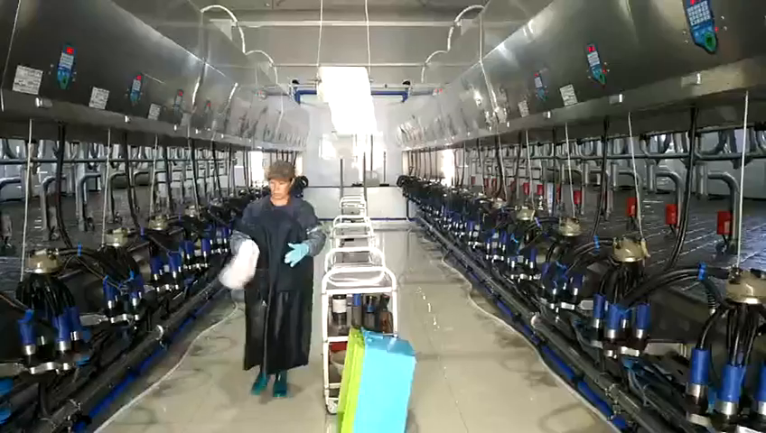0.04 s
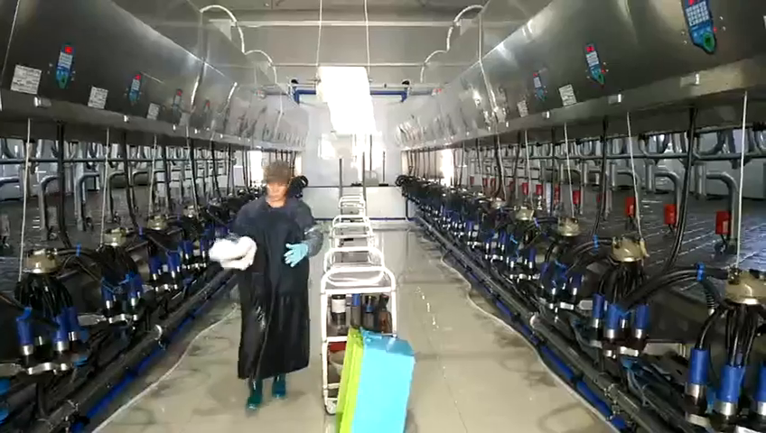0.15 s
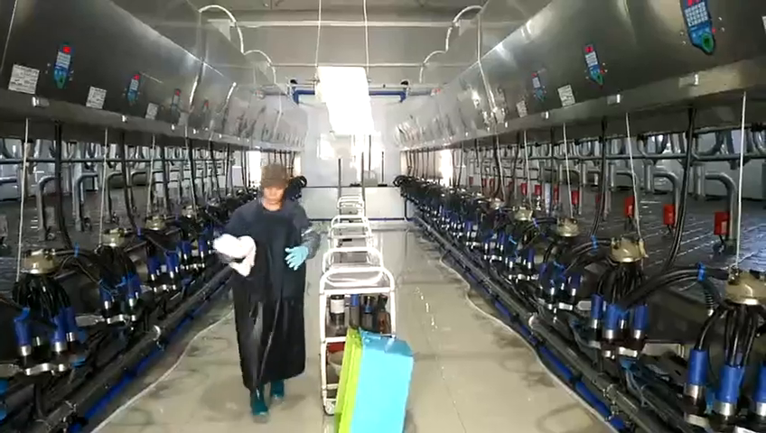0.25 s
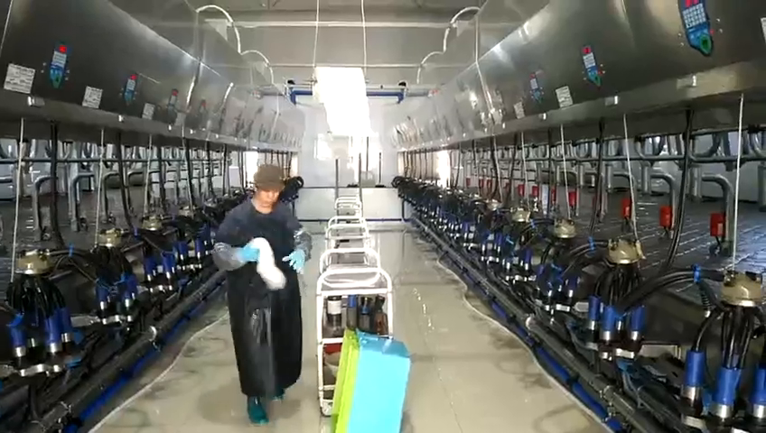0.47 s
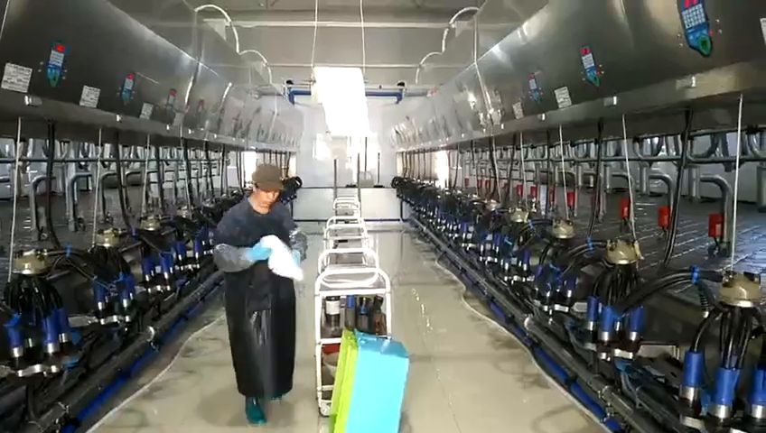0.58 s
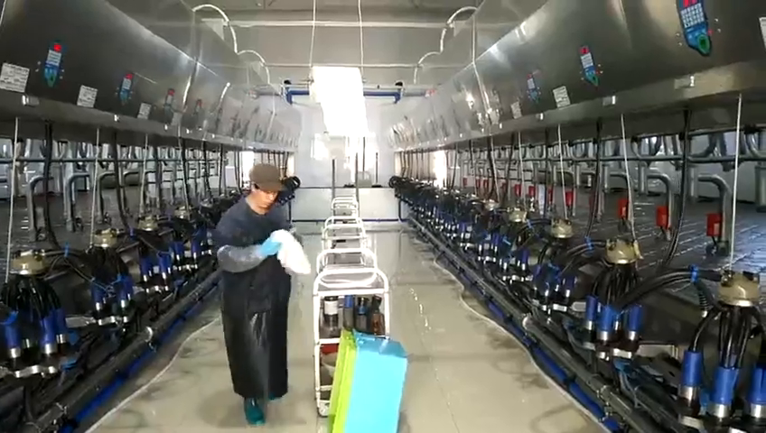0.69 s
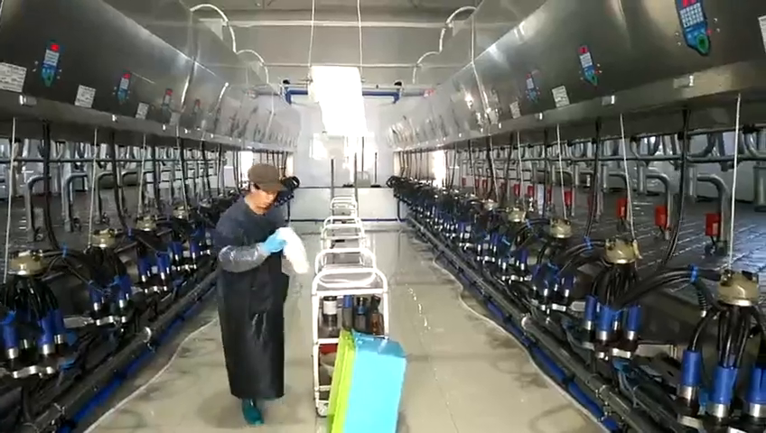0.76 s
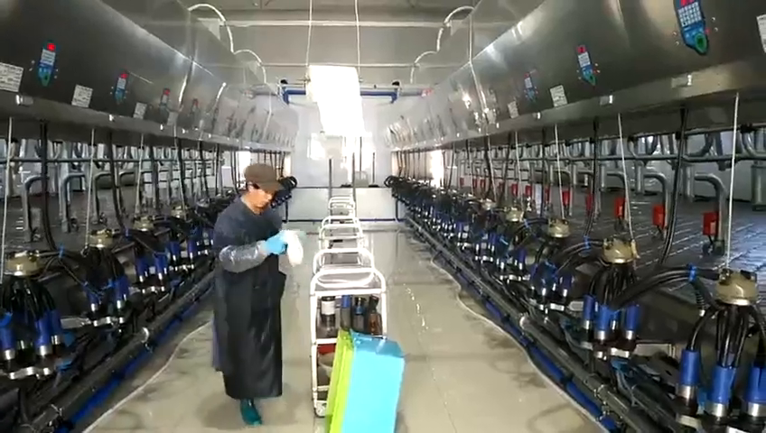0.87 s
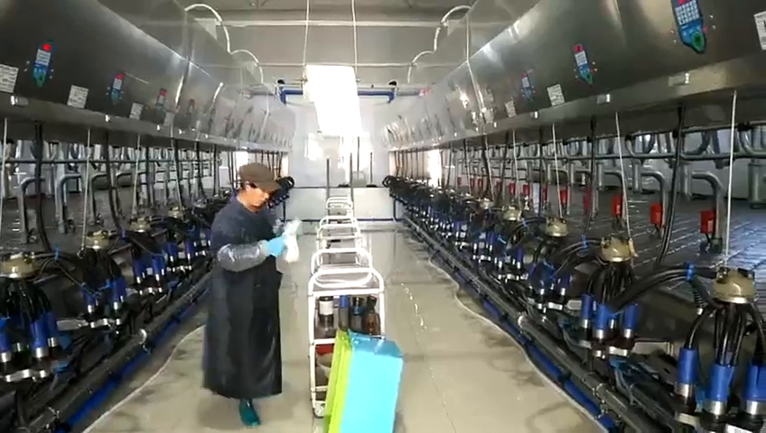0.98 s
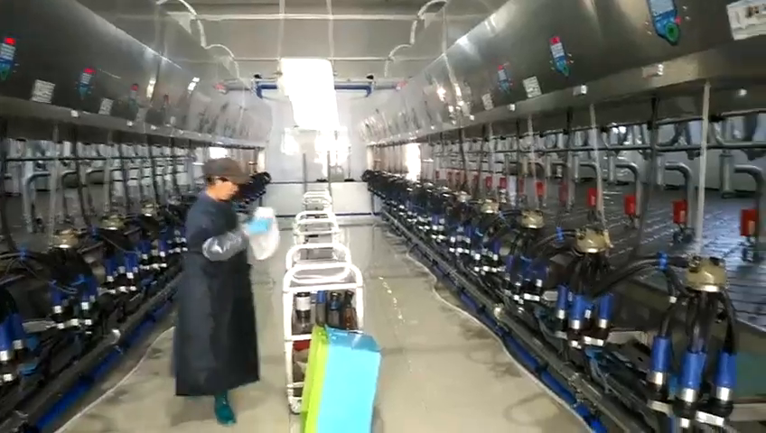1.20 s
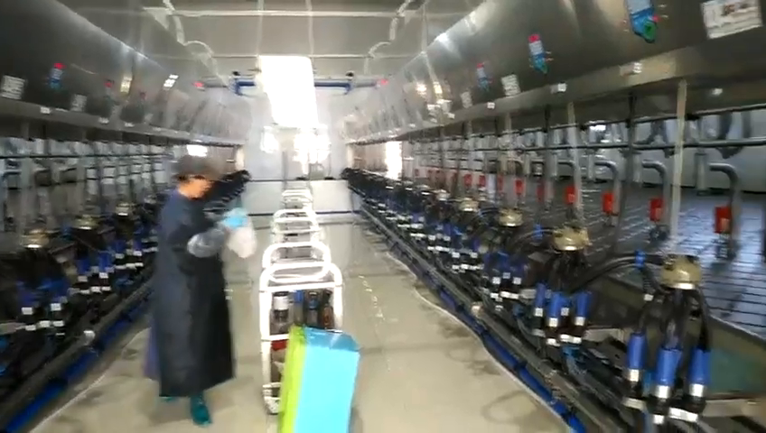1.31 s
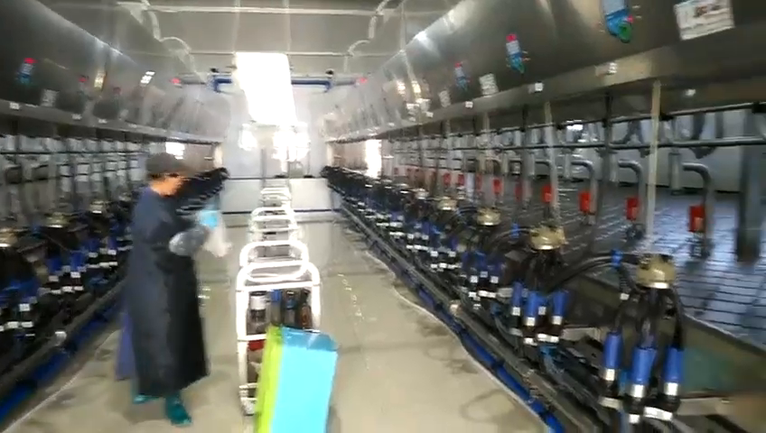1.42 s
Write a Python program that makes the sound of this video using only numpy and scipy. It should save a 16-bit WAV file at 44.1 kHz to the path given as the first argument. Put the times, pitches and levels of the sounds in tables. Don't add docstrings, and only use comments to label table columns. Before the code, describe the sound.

Loud airy pump rush and low hum in a hard-walled dairy parlor, easing off with metallic clicks

```python
import sys
import numpy as np
from scipy import signal
from scipy.io import wavfile

SR = 44100
rng = np.random.default_rng(int(sys.argv[2]) if len(sys.argv) > 2 else 0)


def dump(signal):
    limited = np.clip(np.atleast_2d(signal).T, -1, 1)
    pcm = np.round(limited * 32767).astype(np.int16)
    wavfile.write(sys.argv[1], SR, pcm)


def decibels_to_gain(level_db):
    exponent = np.asarray(level_db, float) / 20
    return 10 ** exponent


N = 63945
TIME_S = np.arange(N) / SR


def rms_one(x):
    return x / np.sqrt(np.mean(x ** 2) + 1e-20)


def in_time(rows):
    time_s, *columns = np.transpose(rows)
    return [np.interp(TIME_S, time_s, column) for column in columns]


def drift(rate_hz):
    pole = np.exp(-80 * np.pi * rate_hz / SR)
    white = rng.standard_normal(N // 40 + 2002)
    slow = signal.lfilter([1], [1, -2 * pole, pole * pole], white)[2000:]
    return np.interp(np.arange(N) / 40, np.arange(len(slow)), rms_one(slow))


def ring(x, pitch_hz, t60_s):
    radius = decibels_to_gain(-60 / (t60_s * SR))
    angle = 2 * np.pi * pitch_hz / SR
    feedback = [1, -2 * radius * np.cos(angle), radius * radius]
    return signal.lfilter([0, np.sin(angle)], feedback, x + 1e-18)


def bandpass(x, order, low_hz, high_hz):
    return signal.sosfilt(signal.butter(order, [low_hz, high_hz], "band", fs=SR, output="sos"), x)


def highpass(x, order, low_hz):
    return signal.sosfilt(signal.butter(order, low_hz, "high", fs=SR, output="sos"), x)


def banded_noise(spectrum, patchy_db):
    out, together = 0, drift(9)
    edges = 35 * 2 ** np.arange(0, 8.8, 1 / 3)
    white = rng.standard_normal((2, N))
    spectrum_hz, spectrum_db = np.transpose(spectrum)
    for k, (low, high) in enumerate(zip(edges, edges[1:])):
        band = bandpass(white[k % 2], 2, low, high)
        level_db = np.interp(np.log(low * high) / 2, np.log(spectrum_hz), spectrum_db)
        flicker_db = patchy_db * (0.41 * together + drift(21.7))
        out = out + band * decibels_to_gain(level_db + flicker_db)
    return rms_one(out)


# time_s, pitch_hz, level_db
EXHAUST_BEAT = [(0.13, 89, -57), (0.224, 91.39, -39.5), (0.258, 88.57, -47.5), (0.36, 90.56, -36.5),
                (0.47, 87.3, -42.5), (0.494, 86.95, -65), (0.548, 87.05, -34.5), (0.658, 87.7, -37),
                (0.732, 81.06, -43.5), (0.882, 78.68, -32), (0.934, 80.1, -43.5), (0.978, 77.18, -29),
                (1.044, 76.87, -53), (1.082, 75.2, -37.5), (1.184, 75.7, -56), (1.254, 71.8, -45),
                (1.39, 75.8, -69), (1.45, 78.8, -33.5)]


def shaft():
    beat_hz, beat_db = in_time(EXHAUST_BEAT)
    return np.cumsum(beat_hz) / 2 / SR, beat_db


# time_s, air_rush_db, casing_drone_db
PUMP_LOAD = [(0.13, -67, -54), (0.154, -54.5, -45.5), (0.232, -45, -39), (0.438, -37, -31.5),
             (0.582, -38.5, -29), (0.622, -35, -34), (0.654, -47.5, -45), (0.68, -40, -37),
             (0.702, -50.5, -84), (0.754, -55.5, -50), (0.99, -57.5, -51), (1.044, -59.5, -62),
             (1.07, -56.5, -65), (1.424, -56.5, -69), (1.45, -53.5, -64)]


def load():
    return in_time(PUMP_LOAD)


def exhaust(turns, level_db):
    phase = 4 * np.pi * turns + 0.3 * drift(20)
    octave = decibels_to_gain(-14.5 + 2.2 * drift(9.3)) * np.sin(2 * phase + 1.5)
    return np.sqrt(2) * decibels_to_gain(level_db) * (np.sin(phase) + octave)


# (share of the load's, in dB)
SHAFT_ORDERS = [(3, -52, 0.23), (4, -40.5, 1.6), (5, -36.5, 1.04), (6, -29, 1.29), (8, -49.5, 1),
                (10.2, -52, 1.6)]


def casing(turns, drone_db):
    full_drone_db, wobble_db, wobble_hz, wander_rad = -29, 1.5, 18, 0.35
    out = 0
    for order, level_db, swing in SHAFT_ORDERS:
        order_db = level_db + swing * (drone_db - full_drone_db) + wobble_db * drift(wobble_hz)
        phase = 2 * np.pi * order * turns + wander_rad * drift(31)
        out = out + np.sqrt(2) * decibels_to_gain(order_db) * np.sin(phase)
    return out


# frequency_hz, density_db (per Hz)
RUSH_SPECTRUM = [(60, -8), (240, -8.5), (520, -18.5), (1300, -19), (1900, -26), (2500, -19), (5200, -24),
                 (9000, -87)]
# pitch_hz, width_hz, level_db (at full load)
PIPE_RESONANCES = [(405.3, 12.2, -44.5), (624, 78, -45), (2372, 123, -46), (2760, 230, -44.5),
                   (4010, 200, -46.5)]


def rush(load_db):
    full_load_db = -37
    pipes = 0
    for pitch_hz, width_hz, level_db in PIPE_RESONANCES:
        tone = rms_one(ring(rng.standard_normal(N), pitch_hz, 2.56 / width_hz))
        pipes = pipes + decibels_to_gain(level_db - full_load_db) * tone
    return decibels_to_gain(load_db) * (decibels_to_gain(4.5) * banded_noise(RUSH_SPECTRUM, patchy_db=1.5) + pipes)


# frequency_hz, density_db (per Hz)
HALL_SPECTRUM = [(60, -1), (400, -5.5), (560, -24), (1200, -17.5), (1900, -23), (2600, -20), (5500, -25),
                 (9000, -55.5)]


def hall(load_db):
    level_db = -46.5 + 0.26 * np.minimum(load_db + 42.5, 0)
    machinery = banded_noise(HALL_SPECTRUM, patchy_db=3.4)
    boom_level = decibels_to_gain(-11.5 + 2.0 * drift(5.6))
    boom = rms_one(ring(rng.standard_normal(N), 397.5, 0.09))
    return decibels_to_gain(level_db) * (machinery + boom_level * boom)


# time_s, level_db
RELIEF_LEAK = [
    (.15, -84),
    (.25, -62),
    (.37, -46.5),
    (.45, -51),
    (.55, -62),
    (.66, -45.5),
    (.715, -44),
    (.745, -86),
    (.8, -93.5),
]


def leak():
    (level_db,) = in_time(RELIEF_LEAK)
    white = rng.standard_normal(N)
    hiss = bandpass(white, 3, 4170, 6640) + decibels_to_gain(-30.5) * highpass(white, 2, 8000)
    still_open = np.arange(N) < RELIEF_LEAK[-1][0] * SR
    return decibels_to_gain(level_db - 5 + 0.52 * drift(31)) * rms_one(hiss) * still_open


# start_s, level_db (peak), pitch_hz, tail_db (relative to the tick)
VALVE_TICKS = [(0.162, -44.5, 4200, -11), (0.2059, -33, 3560, -30), (0.3715, -23, 4110, -33),
               (0.4284, -35, 3910, -28), (0.4444, -23, 4440, -41), (0.605, -18, 3880, -30),
               (0.8724, -44, 4500, -22), (1.1053, -30.5, 5806, -16), (1.1578, -43.5, 5432, -10),
               (1.205, -44, 4040, -36), (1.3716, -35, 4030, -23), (1.4444, -34.5, 5750, -4.5)]
# pitch_hz, level_db, t60_s
STEEL_MODES = [(3800, -3, .007), (4150, -1, .008), (4600, -1, .007), (5100, -2, .007), (5600, -3, .007),
               (6250, -4, .013), (7000, -8, .008), (7800, -12, .007)]


def ticks():
    spread_oct, gain_db, bounce_s, tail_s = 0.54, 1, 0.0008, 0.16
    start_s, peak_db, tick_hz, tail_db = np.transpose(VALVE_TICKS)
    at = np.minimum((start_s * SR).astype(int), N - 1)
    chance_db = rng.normal(0, 1, (len(at), len(STEEL_MODES)))
    struck = 0
    for k, (mode_hz, mode_db, t60_s) in enumerate(STEEL_MODES):
        mismatch_db = 8 * (np.log2(mode_hz / tick_hz) / spread_oct) ** 2
        clicks = np.zeros(N)
        clicks[at] = decibels_to_gain(peak_db + gain_db + mode_db + chance_db[:, k] - mismatch_db)
        bounce = decibels_to_gain(-3.5) * np.roll(clicks, int(bounce_s * SR) + 7 * k)
        struck = struck + ring(clicks * (-1) ** k + bounce, mode_hz, t60_s)
    clicks = np.zeros(N)
    clicks[at] = decibels_to_gain(peak_db + tail_db)
    tail = signal.lfilter([1], [1, -decibels_to_gain(-60 / (tail_s * SR))], clicks + 1e-18)
    tail = signal.lfilter([.004], [1, -.996], tail)
    echo = 0.84 * tail * rng.standard_normal(N)
    return bandpass(struck, 4, 3600, 7200) + bandpass(echo, 3, 4800, 8300)


# start_s, level_db (peak),
# pitch_hz
PIPE_KNOCKS = [(0.657, -27, 82), (.66, -30, 188.1), (0.63, -44, 517), (.705, -37.5, 669),
               (0.734, -45.5, 830), (1.15, -40.5, 383.5), (1.298, -43.5, 256.5), (1.334, -45.5, 814),
               (1.365, -43.5, 570), (1.387, -47.5, 940), (1.411, -48, 590), (.41, -42, 66),
               (0.628, -30, 349)]


def knocks():
    out, rough = 0, rng.standard_normal(N)
    for start_s, level_db, pitch_hz in PIPE_KNOCKS:
        since_s = TIME_S - start_s
        age = np.clip(since_s, 0, None) / 0.00546
        thump = np.sin(2 * np.pi * pitch_hz * since_s) * 25 / pitch_hz
        push = (0.5 * rough + thump) * age * np.exp(-age)
        t60_s = 1.4 / pitch_hz ** 0.5
        rung = sum(ring(push, pitch_hz * ratio, t60_s) for ratio in (0.8, 1, 1.25))
        out = out + decibels_to_gain(level_db) * rung / np.max(np.abs(rung))
    return out


def scene():
    turns, beat_db = shaft()
    load_db, drone_db = load()
    pump = exhaust(turns, beat_db) + casing(turns, drone_db)
    air = rush(load_db) + hall(load_db) + leak()
    return (pump + air + ticks() + knocks())[None, :]


def band_limit(x):
    return signal.sosfilt(signal.butter(12, 13960, fs=SR, output="sos"), x)


def record(dry):
    start_s, fade_s = 0.1255, 0.003
    heard = highpass(dry, 4, 51.3)
    opening = np.clip((TIME_S - start_s) / fade_s, 0, 1)
    return band_limit(heard * opening)


dry = scene()
out = record(dry)
dump(out)
```